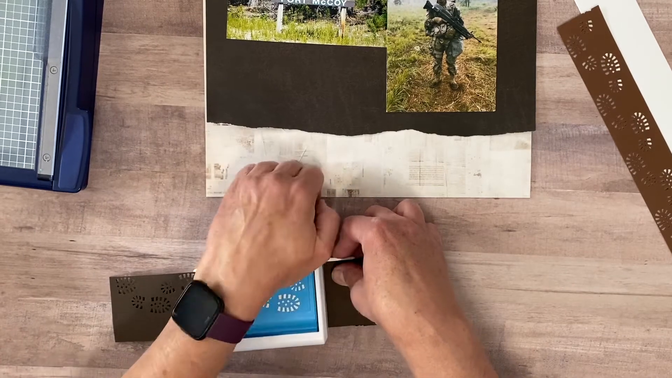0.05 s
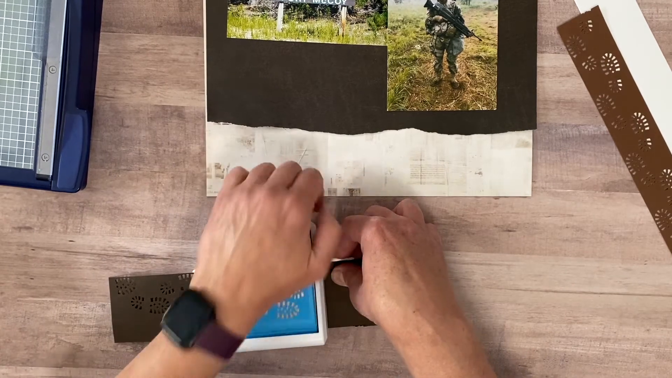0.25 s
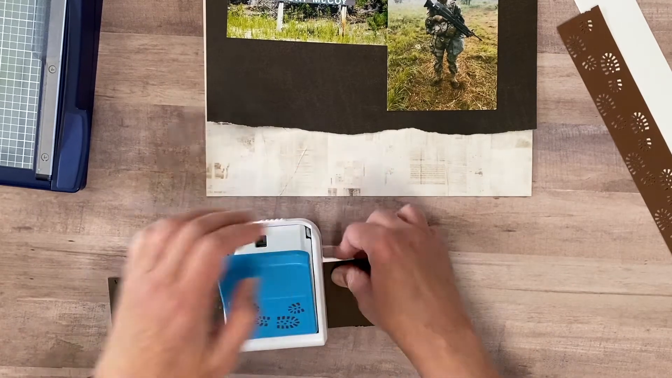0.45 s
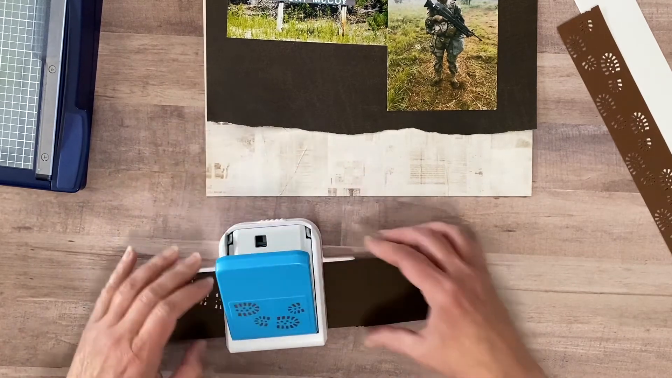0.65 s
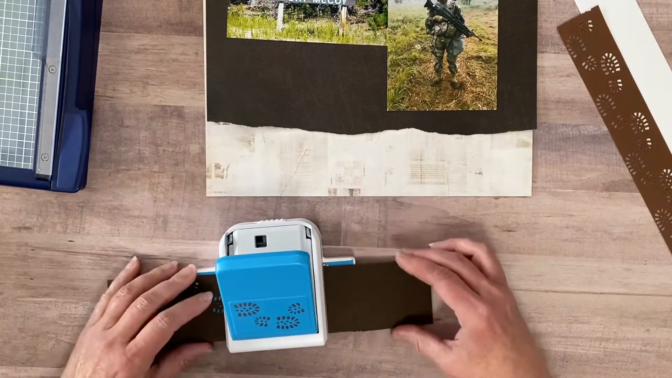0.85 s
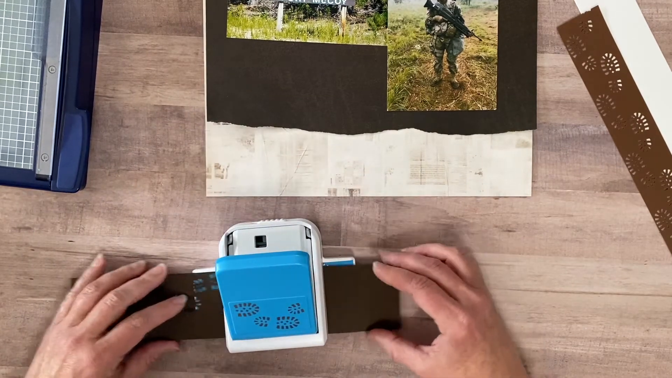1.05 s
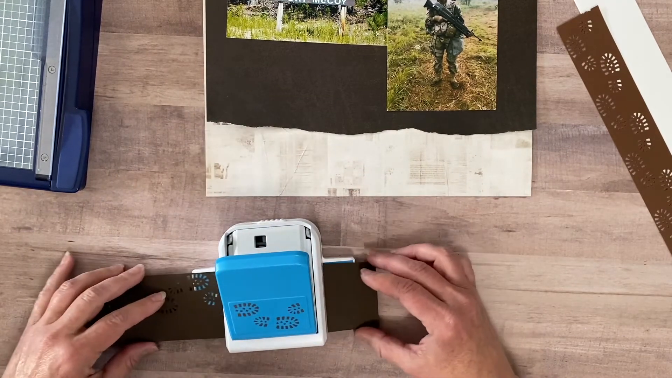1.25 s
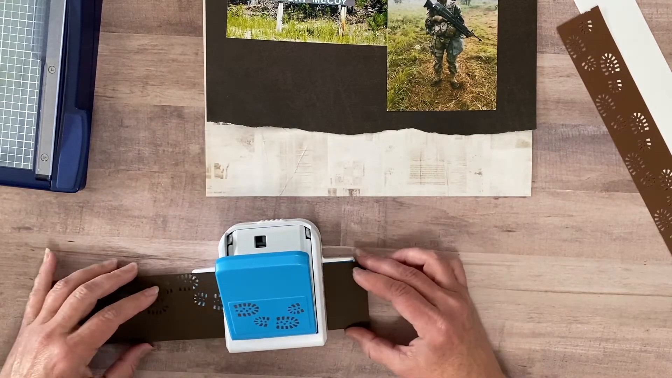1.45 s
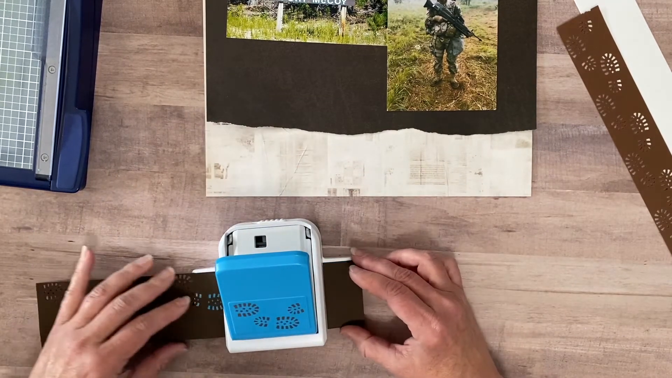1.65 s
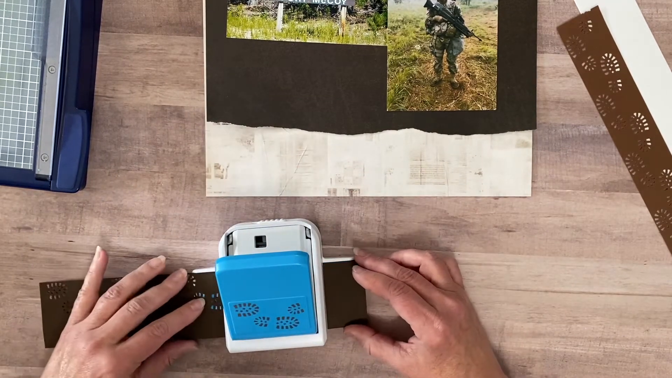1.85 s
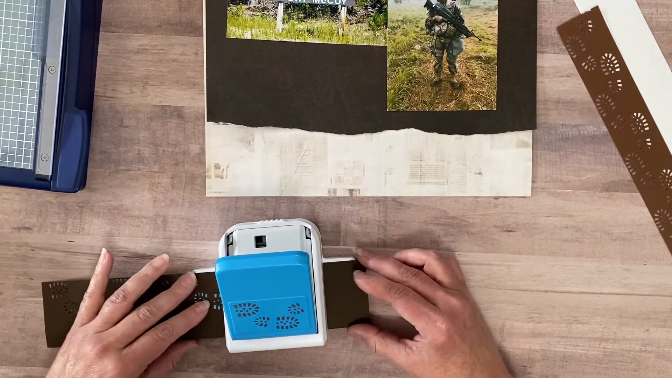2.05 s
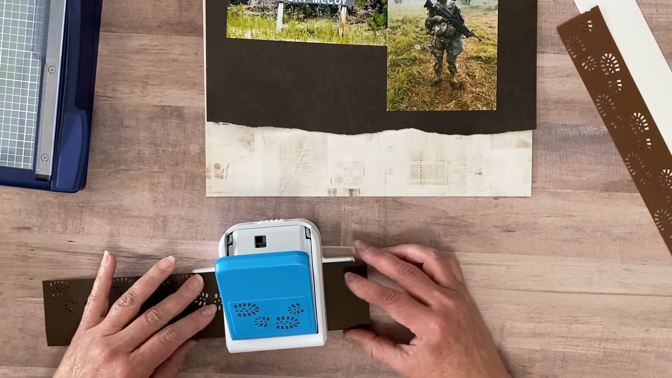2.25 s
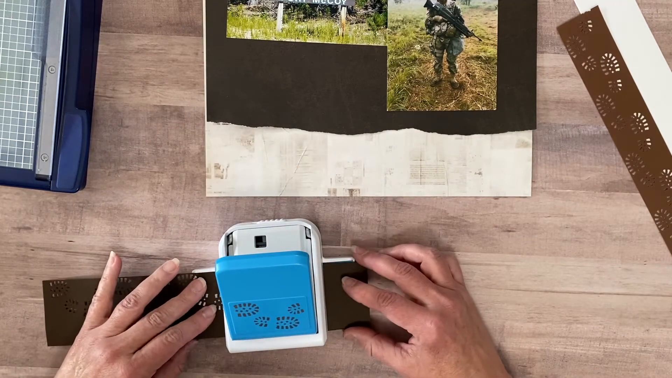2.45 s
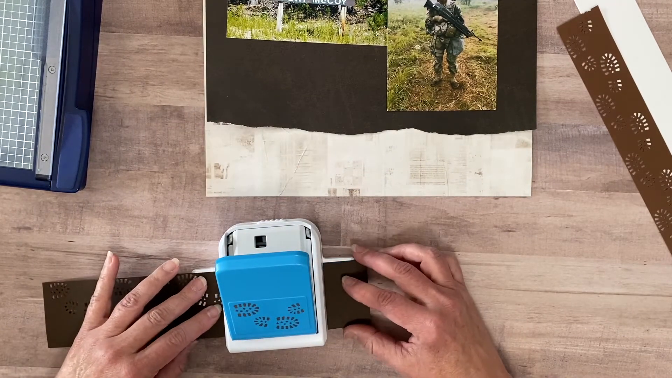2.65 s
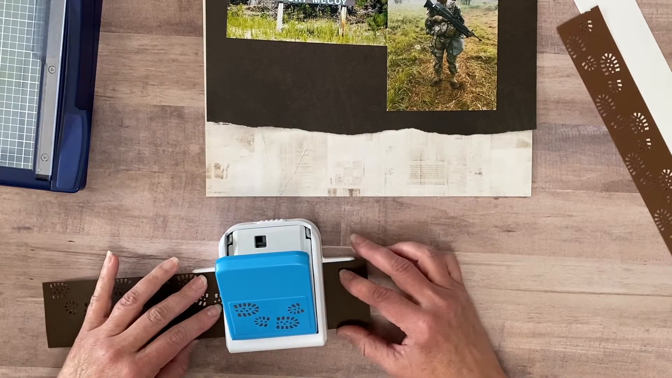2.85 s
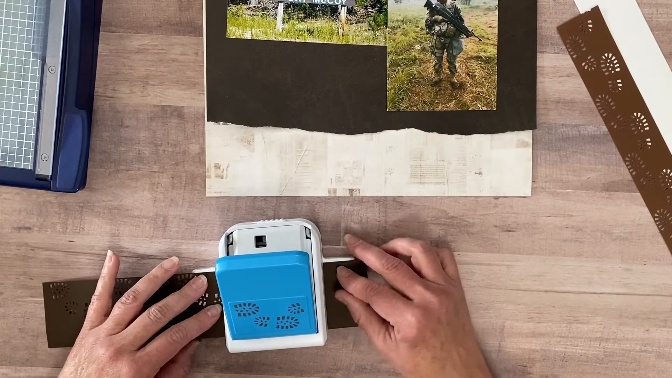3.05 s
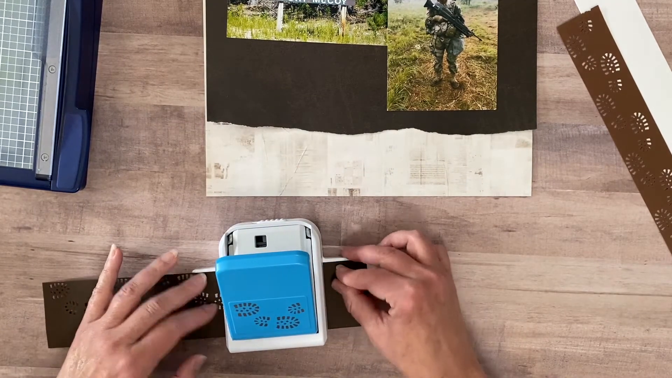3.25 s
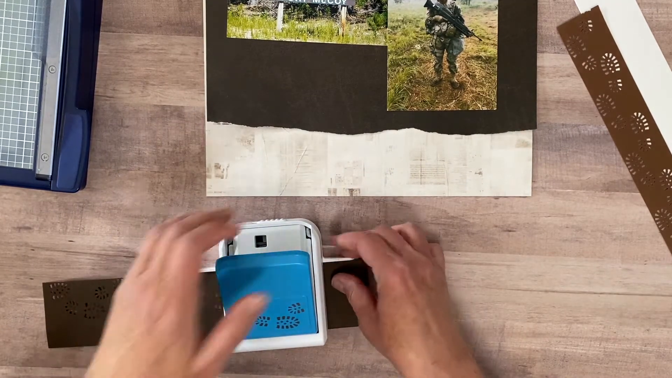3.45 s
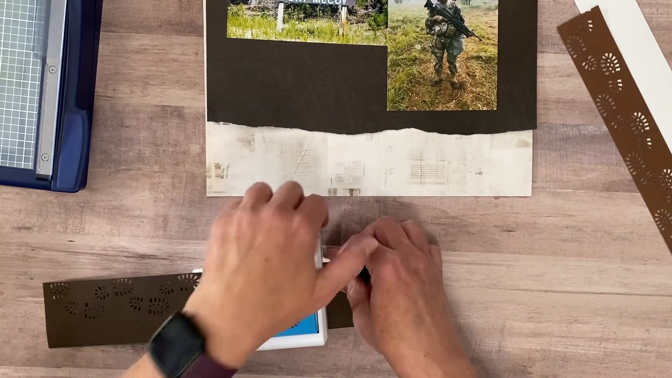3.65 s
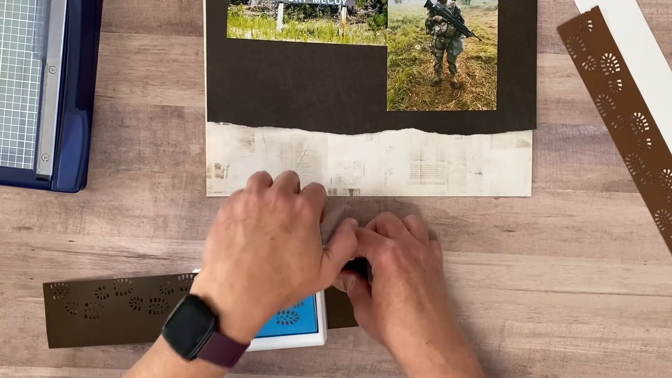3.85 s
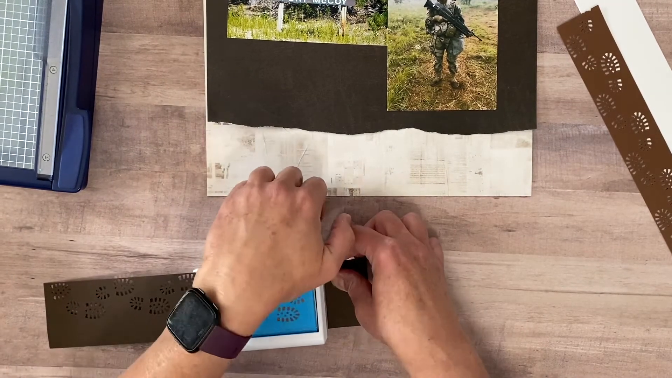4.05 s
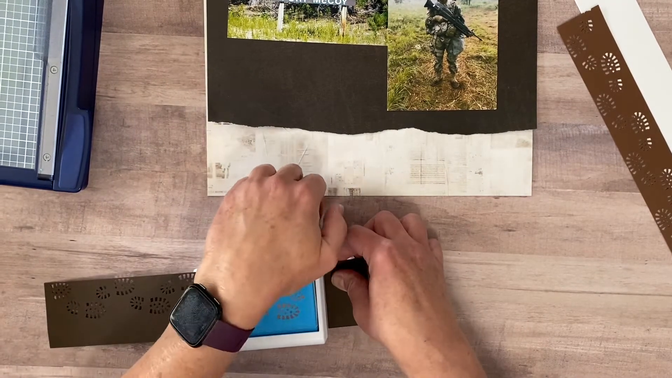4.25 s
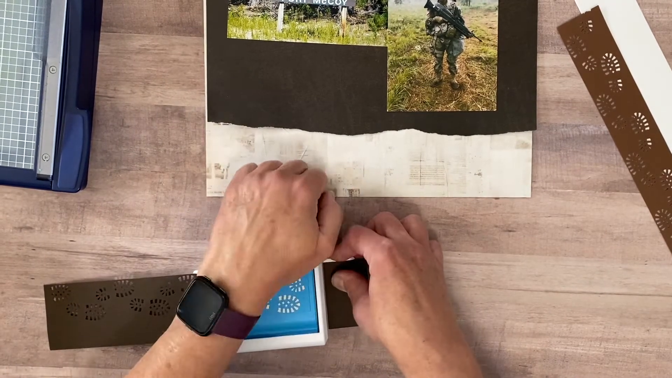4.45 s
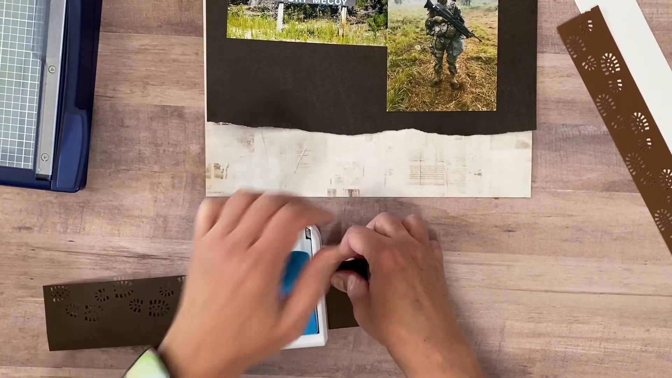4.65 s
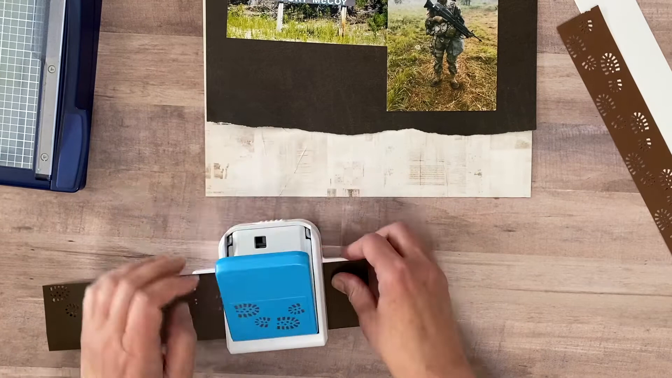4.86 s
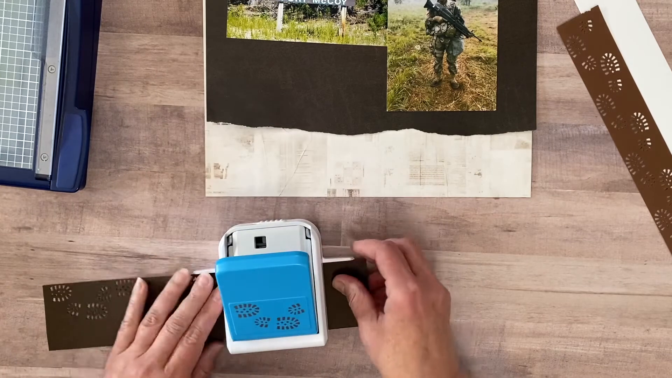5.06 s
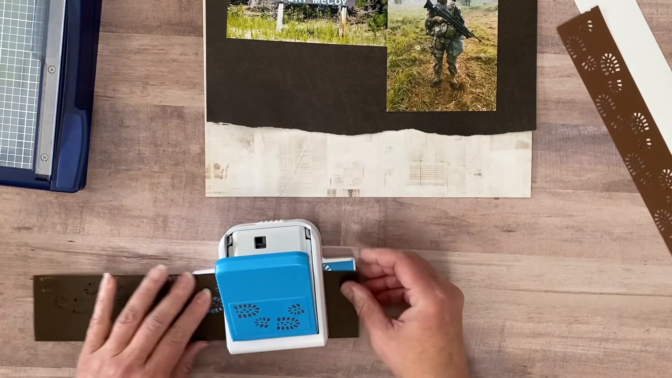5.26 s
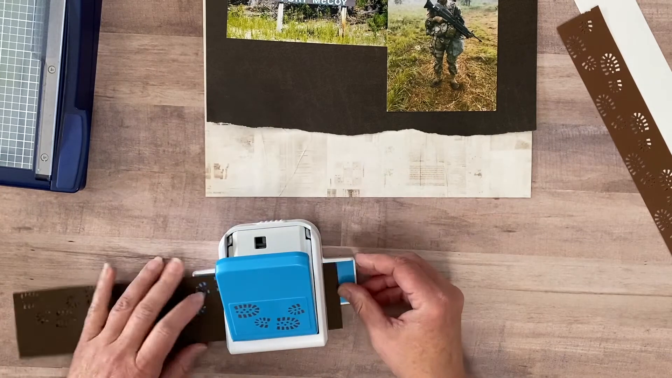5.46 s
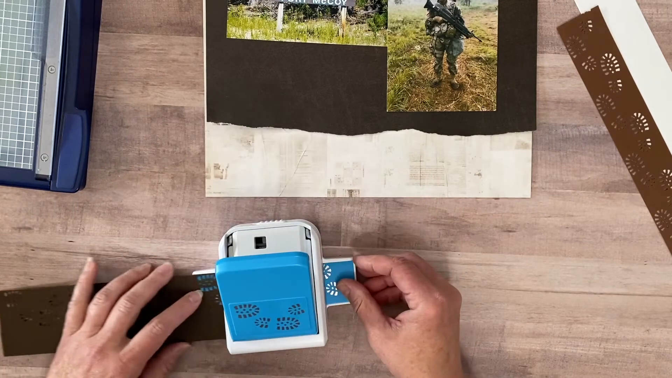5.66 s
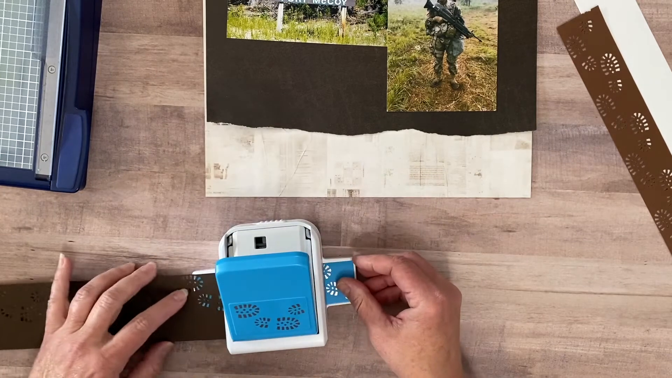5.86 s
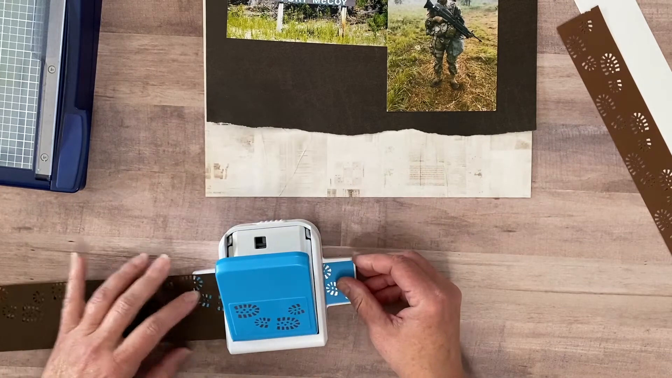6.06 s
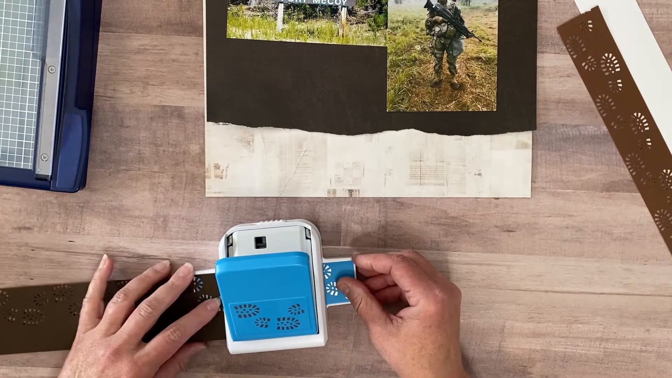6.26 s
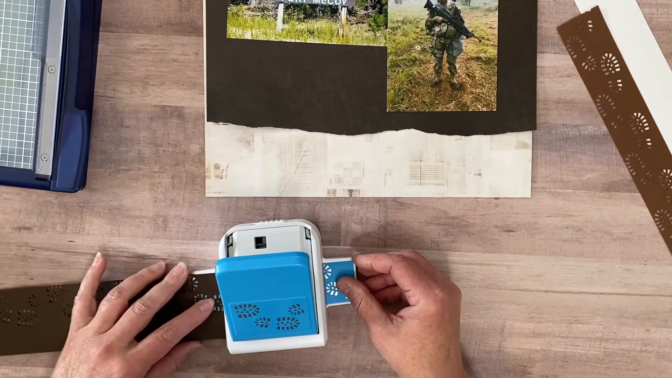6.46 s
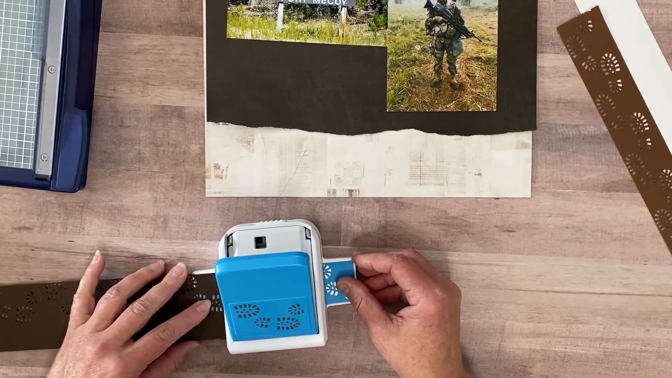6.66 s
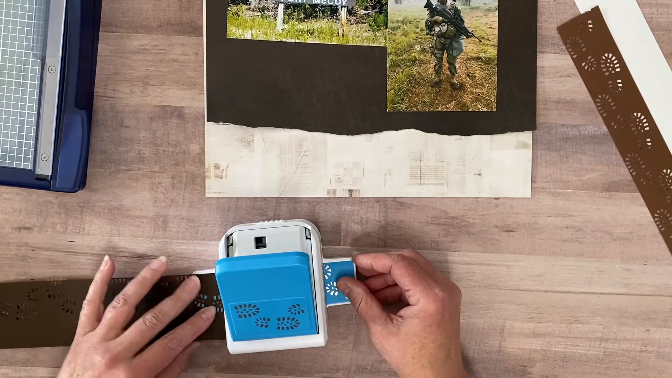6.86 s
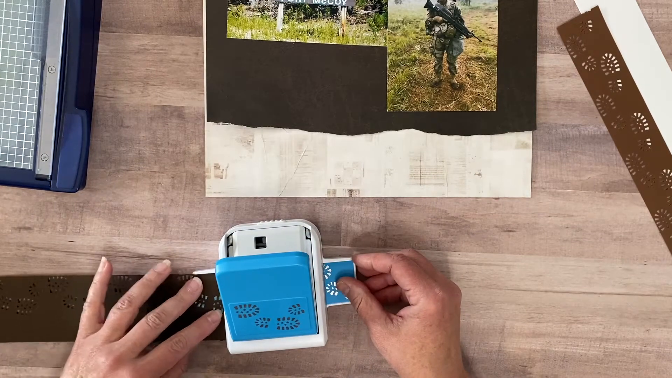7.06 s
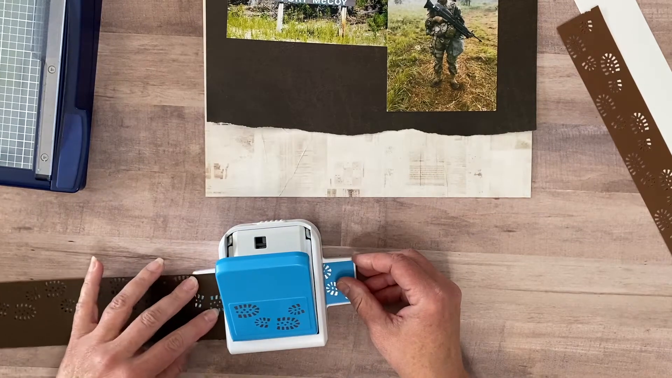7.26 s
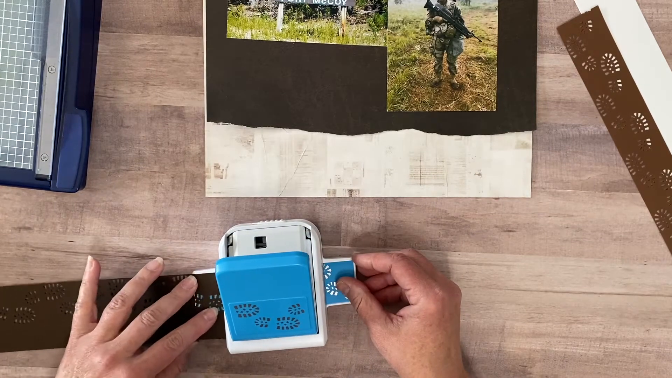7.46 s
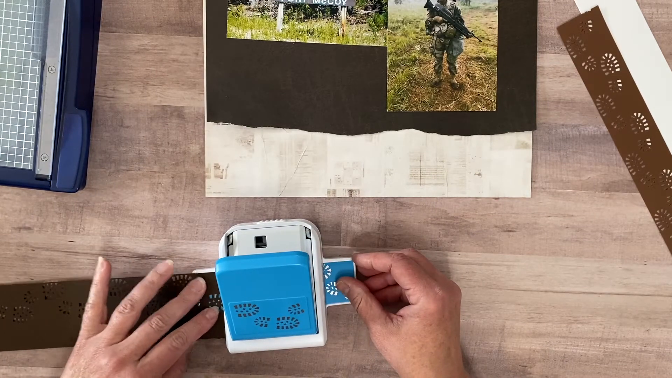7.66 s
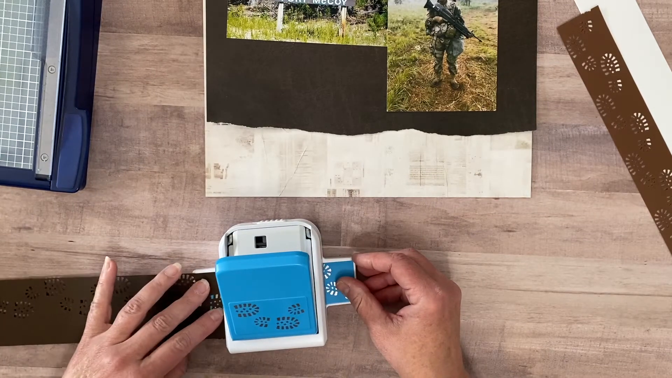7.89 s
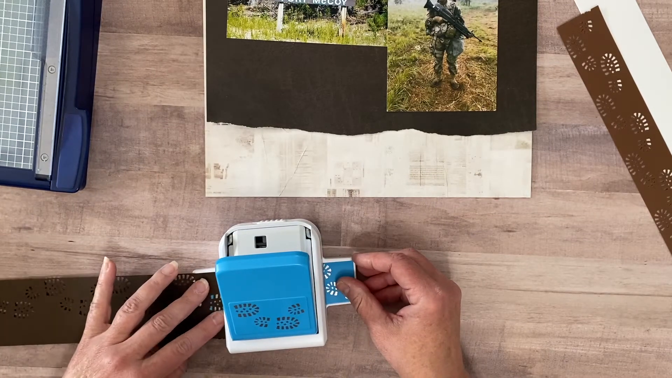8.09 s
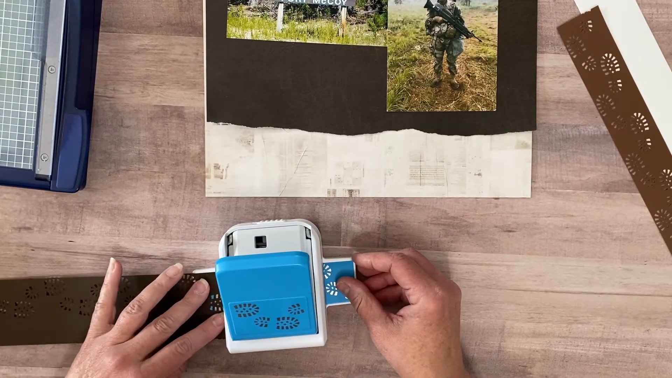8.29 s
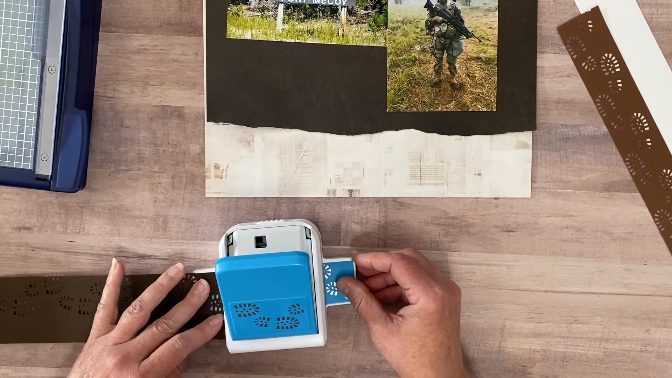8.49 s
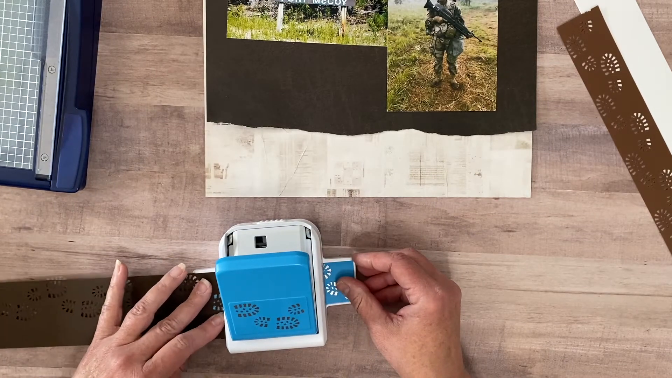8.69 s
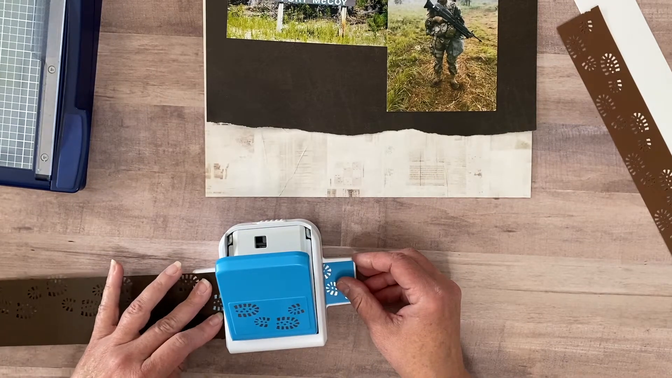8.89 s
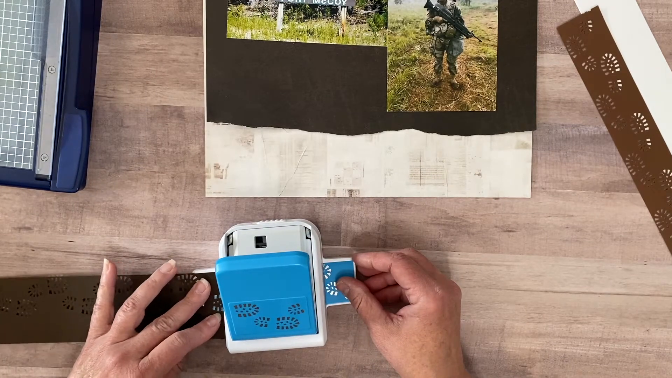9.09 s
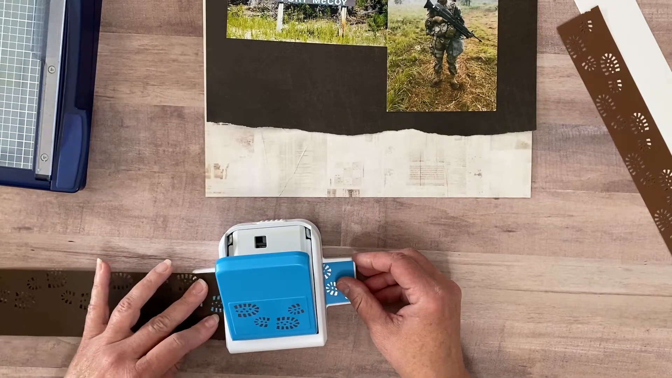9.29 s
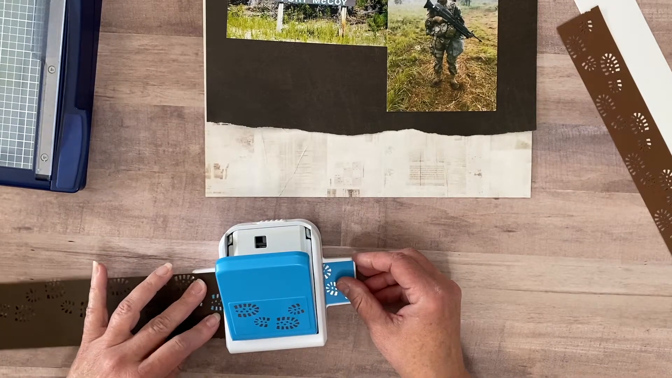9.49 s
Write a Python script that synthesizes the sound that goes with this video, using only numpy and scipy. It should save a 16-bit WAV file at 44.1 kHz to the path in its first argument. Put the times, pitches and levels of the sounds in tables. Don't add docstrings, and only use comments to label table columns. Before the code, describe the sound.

A plastic hand punch clacks back, a card strip slides and ticks, then a violent distorted crunch with a wooden table thud, then faint rustling.

```python
import sys
import numpy as np
from scipy import signal
from scipy.fft import rfft, irfft, next_fast_len
from scipy.io import wavfile
from scipy.ndimage import uniform_filter1d

SR = 44100
rng = np.random.default_rng(int(sys.argv[2]) if len(sys.argv) > 2 else 0)


def boost(x):
    u = np.asarray(x, float) / 20
    return 10 ** u


def to_wav(s):
    ch = np.atleast_2d(s).T
    pcm = np.round(np.clip(ch, -1, 1) * 32767)
    wavfile.write(sys.argv[1], SR, pcm.astype(np.int16))


N = 420273

# start in seconds, hold in seconds, time to fade 20 dB in seconds,
# hiss level in dB, housing buzz in dB.
LEVER_STROKES = [(0, 0.0055, .15, -49, -38.5), (.092, .065, .02, -35, -34), (.168, 0.0013, .09, -44.5, -31),
                 (.32, 0.042, 0.13, -58, -56), (3.71, .018, .02, -51, -40), (3.778, .05, .02, -56, -50),
                 (3.835, .025, .04, -48, -39), (3.89, .05, .02, -55, -49.5), (3.955, .005, .1, -43.5, -37),
                 (4.02, .09, .02, -49, -47), (4.127, .01, .02, -31.5, -27.5),
                 (4.142, 0.022, .118, -13.5, -5.5), (4.36, .035, .02, -48, -41),
                 (4.404, 0.065, .015, -36.5, -32), (4.476, 0.00081, .1, -45, -32),
                 (4.62, 0.124, 0.066, -56, -64)]
# fastest moment in seconds, time to swell 20 dB in seconds,
# time to fade 20 dB in seconds, hiss level in dB, guide buzz in dB.
SLIDES = [(.82, 0.35, 0.38, -43, -55), (.92, 0.19, 0.22, -52, -48.5), (1.11, 0.12, 0.22, -57.5, -50.5),
          (1.42, 0.65, 0.31, -53.5, -67), (1.31, 0.076, 0.062, -60, -49.5), (1.589, 0.12, 1, -61.5, -65),
          (1.96, 0.072, 0.12, -52, -51.5), (2.62, 0.17, 0.5, -62.5, -65), (2.742, .045, .055, -39.5, -42.5),
          (3.0, 0.35, 0.2, -51, -56), (3.35, .2, .1, -62, -61), (3.225, 0.17, 0.042, -50.5, -47),
          (3.532, .12, 0.2, -56.5, -58.5), (4.83, 0.052, 0.14, -48, -44.5), (4.862, .03, 0.064, -37, -45),
          (4.945, .08, 0.21, -47, -57.5), (5.16, 0.28, 0.12, -48, -51.5), (5.207, 0.052, 0.02, -37, -42),
          (5.331, 0.062, 0.067, -47.5, -44.5), (5.53, 0.46, 0.22, -51.5, -57.5),
          (5.8, 0.022, 0.018, -45, -55), (5.9, 0.11, 0.55, -54, -71.5), (6.046, 0.078, 0.13, -56, -56),
          (6.215, 0.072, 0.074, -61.5, -54.5)]
# stopping time in seconds, time to swell 20 dB in seconds, hiss level in dB.
NUDGES = [(6.58, 0.15, -58), (6.64, 0.028, -55), (6.74, 0.25, -60.5), (6.84, 0.23, -59), (7.12, 0.23, -56),
          (7.28, .03, -65), (7.41, 0.031, -60), (7.57, .12, -60.5), (7.73, 0.032, -68), (7.95, 0.079, -58),
          (8.03, .2, -60.5), (8.14, 0.11, -61.5), (8.25, 0.16, -64), (8.46, 0.083, -62), (8.58, .3, -67),
          (8.7, .12, -65.5), (8.8, .1, -68), (8.99, 0.28, -65), (9.14, .2, -63.5), (9.35, .6, -61)]
STRIP_HALTS = [2.8, 5.957, 6.69, 6.785, 8.04, 8.2, 8.27, 8.63, 9.03]
# start in seconds, hold in seconds, time to fade 20 dB in seconds,
# thrum level in dB, sway level in dB.
LEANS = [(0, .001, .05, -29.5, -22.5), (0.085, 0.055, .05, -24.5, -28), (0.164, .001, .11, -18.5, -24),
         (0.447, 0.17, .2, -52, -57), (2.835, 0.16, .1, -55.5, -49), (3.164, .04, .3, -47.5, -43.5),
         (3.475, 0.16, .3, -51, -39.5), (3.716, .001, .19, -30, -22), (3.848, .001, .065, -21, -28),
         (3.951, .001, .09, -21.5, -25.5), (4.11, .02, .05, -37.5, -30), (4.14, .06, .11, -1, -11.5),
         (4.403, .001, .05, -21, -25), (4.436, .04, .03, -20.5, -32), (4.473, .02, 0.15, -27.5, -23),
         (4.647, .001, .04, -38.5, -32.5), (4.723, 0.62, .3, -58.5, -47.5)]
# time in seconds, extra level in dB.
FULL_WEIGHT = [
    (4.134, 0),
    (4.14, 5),
    (4.19, 4),
    (4.22, 0),
]

# time in seconds, crack peak in dB, crack centre in Hz,
# housing level in dB, its strongest ring in Hz.
KNOCKS = [(.0495, -46.5, 5745, -26.5, 875), (.082, -32, 8550, -34, 755), (3.7085, -36.5, 2780, -24.5, 718),
          (3.716, -33, 2760, -26, 1010), (3.8341, -27.5, 6943, -18.5, 656), (3.8435, -21, 4310, -14, 768),
          (3.8489, -28.5, 2973, -10, 1552), (3.9498, -16, 5010, -18, 644.3),
          (4.1266, -24, 5244, -22, 784.5), (4.1344, -12.5, 7290, -10.5, 835), (4.1396, -4, 2478, 0.5, 1118),
          (4.153, 2, 5064, -5.5, 964), (4.1615, 3.5, 3977, -5, 1005), (4.1699, 3.5, 5990, -3.5, 776),
          (4.1815, -4.5, 4028, -7.5, 600), (4.1874, 0, 8630, -8, 667), (4.3974, -28.5, 7294, -20, 874.6)]
# the same five columns as the knocks, in seconds, dB, Hz, dB, Hz.
CARD_TICKS = [(0.527, -42, 7820, -42.5, 670), (0.5938, -35, 6280, -42.5, 610),
              (0.6988, -33, 6850, -59, 1150), (0.9084, -48, 7310, -40, 1050),
              (1.1194, -51, 7820, -39, 1010), (1.3007, -51, 7400, -38.5, 940),
              (3.0964, -47, 6900, -45, 1085), (3.481, -57, 7710, -44, 1106), (3.5294, -58, 3950, -42, 1010),
              (4.815, -14.5, 6350, -21, 1035), (5.0801, -37.5, 7700, -39, 700),
              (5.3153, -32.5, 6900, -26, 1190), (5.449, -55, 7250, -42, 774),
              (6.0342, -41.5, 7300, -42, 1090), (6.0494, -41, 2580, -35.5, 1153),
              (6.1994, -49.5, 5770, -51, 990)]
# the same five columns as the knocks, in seconds, dB, Hz, dB, Hz.
CARD_SNAPS = [(0.4123, -41, 9250, -45, 779), (0.57, -35, 8480, -56, 637), (1.8307, -46.5, 7950, -49, 931),
              (2.8804, -34.5, 8300, -64, 743), (2.9013, -38.5, 6870, -58, 1050),
              (3.4171, -40, 4190, -52, 630), (3.4286, -41, 4510, -39, 564),
              (3.7699, -12, 6560, -23.5, 1587), (5.1366, -27, 8200, -38, 896),
              (7.2271, -52.5, 10020, -62, 683.5), (7.888, -44, 7440, -59.5, 815),
              (8.1025, -43.5, 8600, -61, 650)]
# the same five columns as the knocks, in seconds, dB, Hz, dB, Hz.
SCUFFS = [
    (1.9596, -51, 8740, -44, 961),
    (3.169, -22.5, 5650, -33.5, 1840),
    (3.2275, -40.5, 5440, -47, 845),
    (3.9729, -31.5, 7560, -47, 820),
    (4.0443, -31, 5100, -31.5, 1181),
    (4.1087, -26, 8000, -23.5, 1150),
    (4.856, -28, 6900, -42, 1050),
    (5.7926, -42, 7650, -37, 1151),
]
# time in seconds, peak in dB.
FINGER_POPS = [
    (4.637, -35.5),
    (4.647, -23.5),
    (4.669, -35),
    (4.79, -29),
]
# time in seconds, peak in dB.
THUDS = [
    (3.716, -23),
    (3.836, -16.5),
    (3.9494, -13),
    (4.13, -17),
    (4.1399, -1),
    (4.157, 2),
    (4.172, 0),
    (4.185, -1.5),
    (4.3993, -12),
]
# time in seconds, crack peak in dB, ring in dB, thud in dB.
CLACKS = [
    (0.1574, -12, -2, -5),
    (4.4645, -9.5, -6, -8),
]
# start in seconds, end in seconds, pitch in Hz, level in dB.
SQUEAKS = [
    (0.315, 0.323, 4040, -57),
    (3.47, 3.564, 1120, -53),
    (3.501, 3.558, 2200, -61.5),
    (3.49, 3.58, 3950, -63),
    (5.866, 5.93, 3250, -75),
    (5.871, 6.028, 4900, -74),
    (8.886, 9.351, 7200, -71),
]

# frequency in Hz, level in dB per Hz.
CARD_COLOUR = [(880, -25.5), (1500, -5), (1840, -7.5), (2380, -11.5), (2990, -10), (4740, -5), (5340, -7.5),
               (6690, -2), (7990, 0.5), (11100, -14.5), (15800, -18.5)]
# frequency in Hz, level in dB per Hz.
LEVER_COLOUR = [(880, -33), (1500, -5.5), (1740, -6), (2990, -24), (3570, -10.5), (5280, -14.5),
                (8390, -10), (10500, -22), (15800, -38.5)]
# frequency in Hz, level in dB per Hz.
NUDGE_COLOUR = [(1500, -4), (2800, -14), (3600, -4), (4300, -7.5), (5000, -8.5), (6000, -9.5), (7100, 3.5),
                (7900, -4.5), (8700, -4.5), (10000, -15), (16000, -21.5)]
# frequency in Hz, level in dB per Hz.
CRACK_COLOUR = [(880, -29.5), (1500, 1), (1960, -4.5), (4430, -8), (6690, -5.5), (9260, -9), (11200, -27),
                (13300, -23), (15800, -27.5)]
# pitch in Hz, level in dB, time to die by 60 dB in seconds.
HOUSING = [(580, -10.5, .04), (830, -11, .04), (903, -4.5, .04), (1025.6, -4, .05), (1120, -4.5, 0.051),
           (1298, -6, 0.035), (1470, -10.5, .04), (1700, -9.5, .04), (1950, -9.5, 0.024),
           (2200, -10, 0.045), (2450, -17.5, 0.01), (2804, -18, .04)]
# pitch in Hz, level in dB, time to die by 60 dB in seconds.
SLOT = [(1068, 2, 0.035), (1831, -7.5, 0.057)]
# pitch in Hz, level in dB, time to die by 60 dB in seconds.
TABLE = [(84, -1.5, .15), (125, -4, .08), (158, -5.5, 0.089), (199.1, -3, 0.096), (227.3, 2, 0.1),
         (286, -0.5, 0.13), (351, 0, 0.079), (399.5, -8.5, 0.21), (449, -8.5, 0.089), (516, -11, 0.13),
         (630, -19.5, 0.046)]
# pitch in Hz, level in dB, time to die by 60 dB in seconds.
SWAY = [(24.3, 6, 0.52), (34.8, 2.5, 0.53), (52, -4.5, 0.069), (70, -9.5, .2)]
# frequency in Hz, time to die by 60 dB in seconds.
ROOM = [(100, 0.36), (1000, 0.22), (4000, 0.4), (12000, 0.45)]
# pitch in Hz, rms level in dB.
HUM = [(59.5, -63.5), (140, -68), (240.5, -58)]
# frequency in Hz, level in dB per Hz.
AIR_COLOUR = [(26, -33), (45, -3), (100, -9.5), (173, -10.5), (260, -8.5), (429, -14), (562, -19.5),
              (1100, -22.5), (3120, -38), (3710, -34.5), (5230, -38.5), (7190, -36.5), (15800, -46.5)]


def unit(x):
    return x / np.sqrt(np.mean(x ** 2))


def coloured(points, size):
    hz, db = np.transpose(points)
    fft_size = next_fast_len(size)
    f = np.arange(fft_size // 2 + 1) * SR / fft_size + 1
    gain = boost(np.interp(np.log(f), np.log(hz), db))
    return unit(irfft(rfft(rng.standard_normal(fft_size)) * gain, fft_size)[:size])


def ring(modes, spread=0.):
    hz, db, t60 = np.transpose(modes)[:, :, None]
    t = np.arange(int(t60.max() * SR)) / SR
    weight, detune = spread * rng.standard_normal((2, len(modes), 1))
    tones = np.sin(2 * np.pi * hz * (1 + 0.0072 * detune) * t)
    return np.sum(boost(db + weight - 60 * t / t60) * tones, axis=0)


def flutter(rate_hz, depth_db):
    k = int(SR / rate_hz)
    steps = np.repeat(rng.standard_normal(N // k + 1), k)
    return boost(depth_db * uniform_filter1d(steps, k)[:N])


def grit(rate_hz, scatter_db):
    clicks = (rng.random(N) < rate_hz / SR) * boost(scatter_db * rng.exponential(size=N))
    smear = np.exp(-np.arange(SR // 100) / (0.0015 * SR))
    return unit(1 + signal.fftconvolve(clicks, smear)[:N])


def add(out, s, sound, db):
    i = int(s * SR)
    part = sound[:N - i]
    out[i:i + len(part)] += boost(db) * part / np.abs(sound).max()


def strokes(s, swell, hold, fade, *levels_db):
    t = np.arange(N // 32 + 2) * 32 / SR
    s, swell, hold, fade = (np.reshape(v, (-1, 1)) for v in (s, swell, hold, fade))
    drop_db = 20 * np.maximum((s - t) / swell, np.maximum(t - s - hold, 0) / fade)
    gains = []
    for db in levels_db:
        loudest = boost(np.max(np.reshape(db, (-1, 1)) - drop_db, axis=0))
        gains.append(np.interp(np.arange(N) / SR, t, loudest))
    return gains


def driven(modes, force):
    return unit(signal.fftconvolve(force * rng.standard_normal(N), ring(modes))[:N])


def patchy(points, depth_db):
    size = next_fast_len(N)
    lines = rfft(coloured(points, size))
    octave = np.log2(np.arange(len(lines)) * SR / size + 1)
    out = np.zeros(N)
    for centre in np.arange(10, 14.4, 1 / 3):
        share = np.maximum(1 - 3 * abs(octave - centre), 0)
        out += flutter(11, depth_db) * irfft(lines * share, size)[:N]
    return unit(out)


def moving():
    t = np.arange(N) / SR
    return 1 - 0.84 * np.max([np.exp(-((t - s) / 0.014) ** 4) for s in STRIP_HALTS], axis=0)


def full_weight():
    return boost(np.interp(np.arange(N) / SR, *np.transpose(FULL_WEIGHT)))


def rubbing():
    drag = flutter(30, 1.5) * grit(900, 1.6)
    body = full_weight() * driven(HOUSING, drag)
    guide = driven(HOUSING + SLOT, drag)
    grip = np.sqrt(drag) * moving() * flutter(55, 1.5)
    lever, slide, nudge = map(np.transpose, (LEVER_STROKES, SLIDES, NUDGES))
    stop_s, swell_s, hiss_db = nudge
    hold_s = swell_s / 4
    nudge_gains = strokes(stop_s - hold_s, swell_s, hold_s, 0.025, hiss_db, hiss_db - 6.5)
    rubs = [(strokes(lever[0], 0.012, *lever[1:]), LEVER_COLOUR, body),
            (strokes(*slide[:2], 0, *slide[2:]), CARD_COLOUR, guide),
            (nudge_gains, NUDGE_COLOUR, guide)]
    out = np.zeros(N)
    for (hiss_gain, buzz_gain), colour, buzz in rubs:
        out += hiss_gain * grip * patchy(colour, depth_db=4.5) + buzz_gain * buzz
    return out


def leaning():
    lean = np.transpose(LEANS)
    thrum, sway = strokes(lean[0], .009, *lean[1:])
    return full_weight() * thrum * driven(TABLE, flutter(22, 1.3)) + sway * driven(SWAY, 1)


def contacts(rows, rise_s, t60_s):
    out, t = np.zeros(N), np.arange(SR // 16) / SR
    shape = (1 - np.exp(-t / rise_s)) * boost(-60 * t / t60_s)
    for s, crack_db, crack_hz, housing_db, ring_hz in rows:
        tint = signal.iirpeak(crack_hz, 2.5, fs=SR)
        crack = coloured(CRACK_COLOUR, len(t))
        add(out, s, shape * (0.65 * crack + signal.lfilter(*tint, crack)), crack_db)
        modes = [(ring_hz, 6, .035)]
        for hz, db, t60 in HOUSING:
            modes.append((hz, 0.41 * db - 14 * abs(np.log2(hz / ring_hz)), t60))
        push = shape * rng.standard_normal(len(t))
        add(out, s, signal.fftconvolve(push, ring(modes, spread=1.8)), housing_db)
    return out


def impacts():
    return (contacts(KNOCKS, rise_s=0.00018, t60_s=0.014)
            + contacts(CARD_TICKS, rise_s=0.00022, t60_s=0.022)
            + contacts(CARD_SNAPS, rise_s=.0001, t60_s=0.0078)
            + contacts(SCUFFS, rise_s=0.0014, t60_s=0.037))


def thuds():
    out, t = np.zeros(N), np.arange(SR // 16) / SR
    for s, db in THUDS:
        force = t * np.exp(-t / 0.00084) * rng.choice([-1, 1])
        add(out, s, signal.fftconvolve(force, ring(TABLE, spread=1.1)), db)
    return out


def clacks():
    out, t = np.zeros(N), np.arange(SR // 10) / SR
    cover_hz, thud_hz = 975, 127.1
    swell = (t / .0018) ** 2 * np.exp(-t / 0.0015)
    for s, crack_db, ring_db, thud_db in CLACKS:
        add(out, s, boost(-60 * t / 0.016) * coloured(CRACK_COLOUR, len(t)), crack_db)
        add(out, s, swell * np.sin(2 * np.pi * cover_hz * t), ring_db)
        add(out, s + 0.0011, -np.sin(2 * np.pi * thud_hz * t) * t * np.exp(-t / 0.0032), thud_db)
        push = swell * rng.standard_normal(len(t))
        add(out, s, signal.fftconvolve(push, ring(HOUSING, spread=2.7)), ring_db - 13.5)
    return out


def squeaks():
    out = np.zeros(N)
    for start, end, hz, db in SQUEAKS:
        i, size = int(start * SR), int((end - start) * SR)
        band = signal.lfilter(*signal.iirpeak(hz, 14, fs=SR), rng.standard_normal(size))
        out[i:i + size] += boost(db) * unit(band) * np.sqrt(np.hanning(size))
    return out * flutter(24.0, 0.92) * moving()


def finger_pops():
    out, t = np.zeros(N), np.arange(SR // 20) / SR
    pop = (1 - np.exp(-t / .00006)) * np.cos(2 * np.pi * 110 * t) * np.exp(-t / 0.0052)
    for s, db in FINGER_POPS:
        add(out, s, pop, db)
    return out


def palm():
    out, t = np.zeros(N), np.arange(SR // 6) / SR
    add(out, 3.712, np.sin(2 * np.pi * 27 * t) * np.exp(-t / 0.044), -15)
    return out


def room(x):
    t = np.arange(int(.7 * SR)) / SR
    tail = np.zeros(len(t))
    room_hz, room_t60 = np.transpose(ROOM)
    for hz in 60 * 2. ** np.arange(8):
        t60 = np.interp(np.log(hz), np.log(room_hz), room_t60)
        band = signal.butter(2, [hz, min(2 * hz, .45 * SR)], "band", fs=SR, output="sos")
        tail += signal.sosfilt(band, rng.standard_normal(len(t))) * boost(-60 * t / t60)
    tail *= t > 0.0076
    return boost(-22) * signal.fftconvolve(x, tail / np.sqrt(np.sum(tail ** 2)))[:N]


def background():
    t = np.arange(N) / SR
    hum = np.zeros(N)
    for hz, db in HUM:
        waver = .25 * np.log(flutter(6, 8))
        hum += boost(db) * np.sqrt(2) * np.sin(2 * np.pi * hz * t + waver)
    rumble_colour = [(4, 3), (15, 2), (25, -8.5), (40, -12), (62, -13.5), (100, -29.0), (300, -61)]
    rumble = boost(-51) * flutter(2.5, 3.5) * coloured(rumble_colour, N)
    air = boost(-57) * flutter(3.2, 0.34) * coloured(AIR_COLOUR, N)
    return air + rumble + hum


def scene():
    near = rubbing() + leaning() + impacts() + thuds() + clacks() + squeaks() + finger_pops() + palm()
    return (near + room(near) + background())[None]


def top_cut(x):
    return signal.sosfilt(signal.butter(12, 15900, fs=SR, output="sos"), x)


def record(dry):
    full_scale = .985
    mix = np.clip(dry, -full_scale, full_scale)
    return top_cut(mix)


dry = scene()
out = record(dry)
to_wav(out)
```